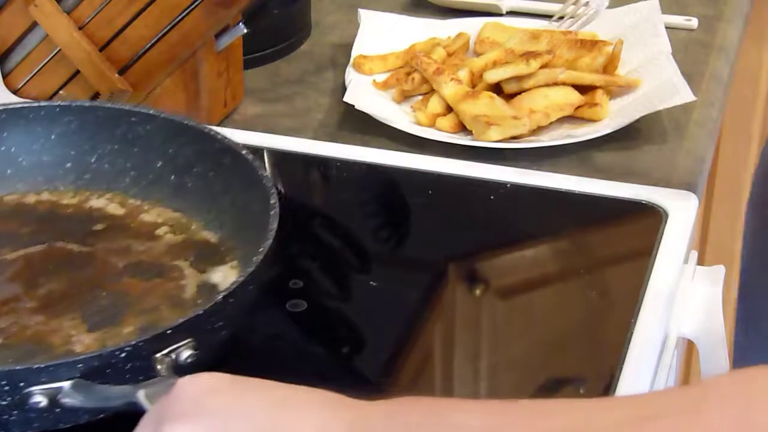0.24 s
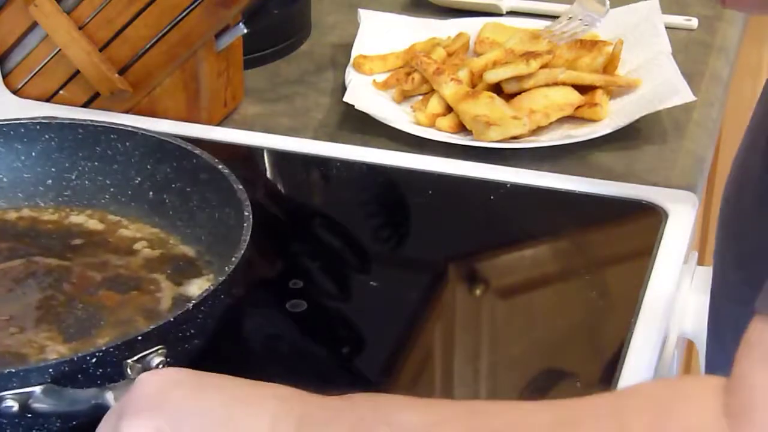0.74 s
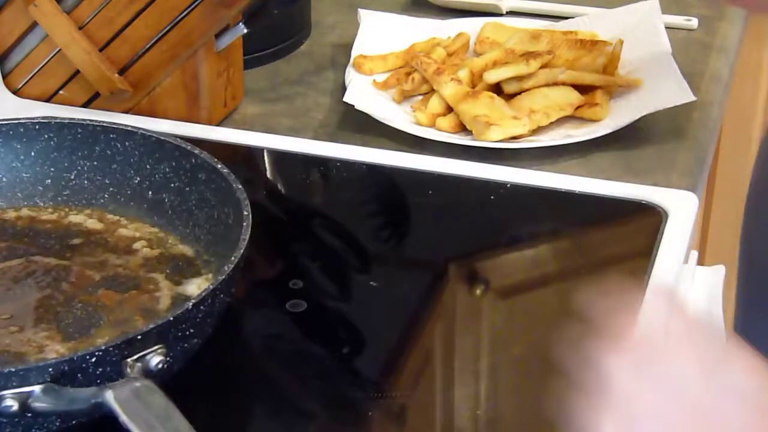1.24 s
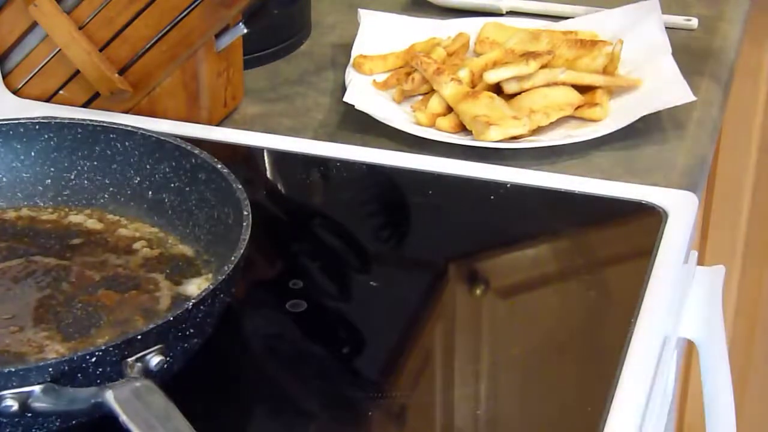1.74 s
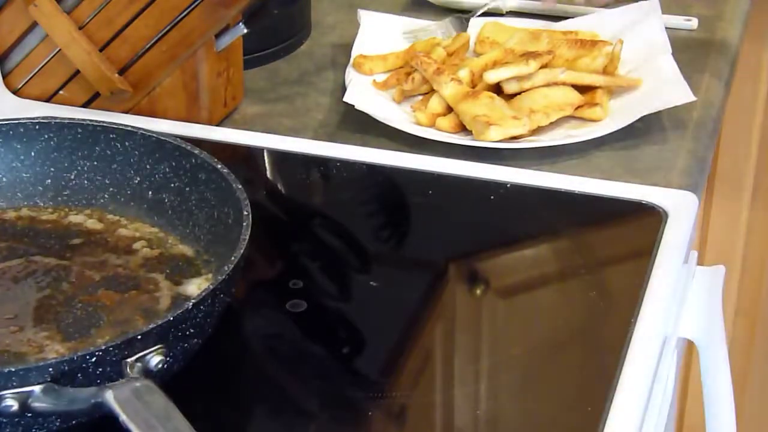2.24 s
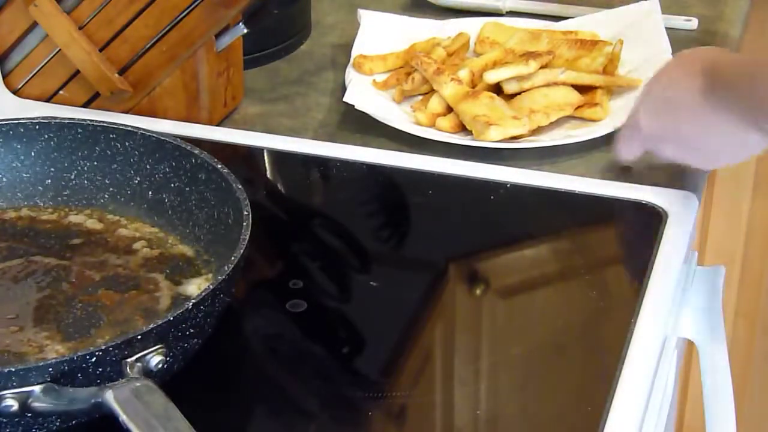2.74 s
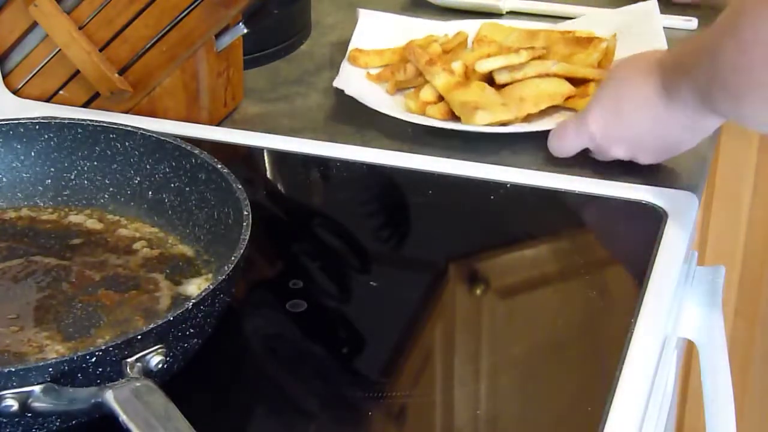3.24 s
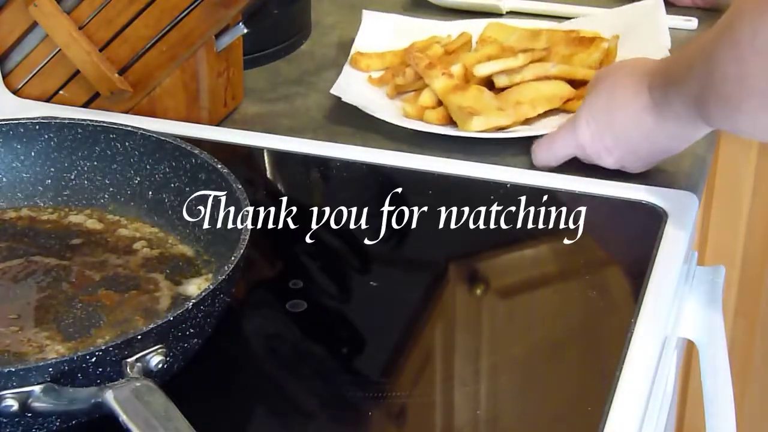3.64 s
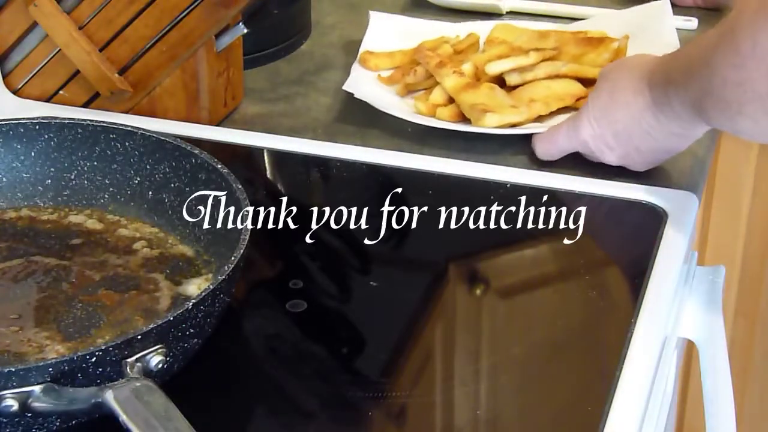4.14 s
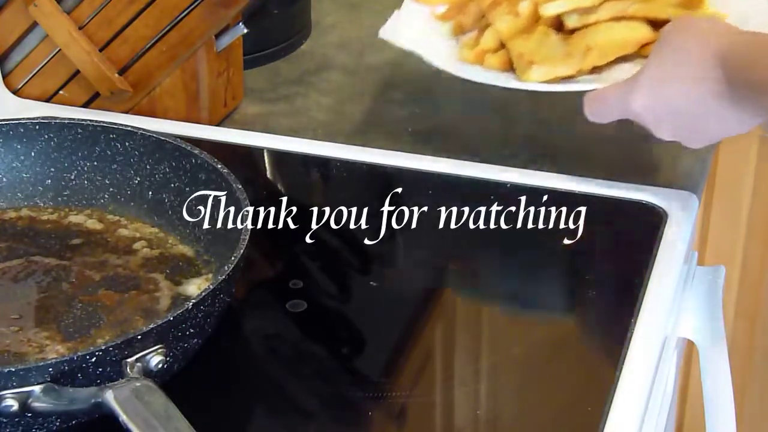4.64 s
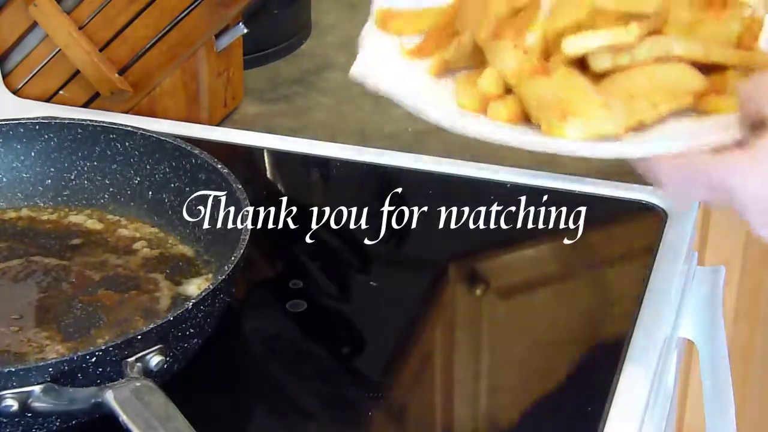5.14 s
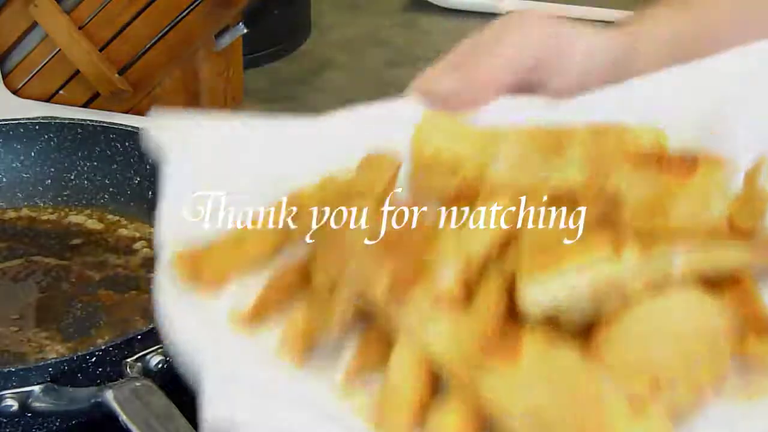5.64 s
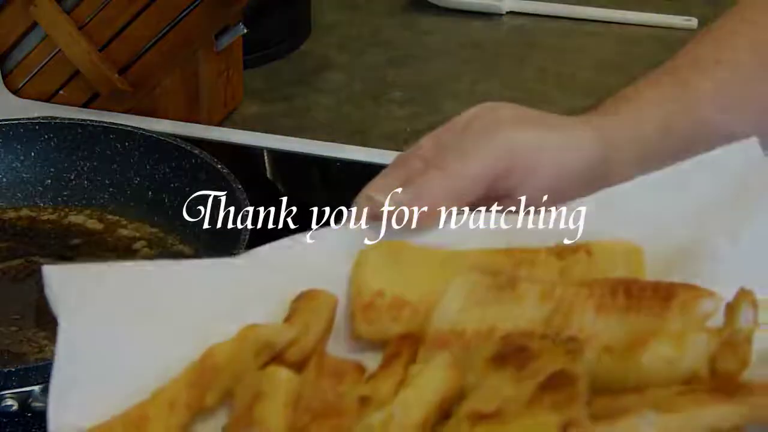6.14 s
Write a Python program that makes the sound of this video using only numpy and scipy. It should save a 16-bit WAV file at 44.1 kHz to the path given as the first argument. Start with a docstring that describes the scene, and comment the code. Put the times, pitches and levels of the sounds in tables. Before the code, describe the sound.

A close, slightly hissy microphone in a reverberant kitchen picks up a constant dull fan. Near the start a pan clunks heavily with a short metallic rattle. After a quiet stretch of light rustling and clicks, a plate bumps softly, then gives bright, hard ceramic knocks, a scrape and several closing taps. Soft rustles and small ticks remain over the fan.

```python
"""A home kitchen under a droning extractor fan, with paper and cloth rustling and small things ticking.
A heavy pan clunks on a glass hob, rattles and settles; a plate is nudged, knocked and dragged off the counter.
Contacts are short knocks, thuds and clicks that ring modal bodies; drags are trains of random slips.
Fan, rustle and hiss are filtered noise, the fan with a thin whine. Echoes and a diffuse tail of over half
a second answer the contacts and rustle at two close microphone ports, which hiss and saturate."""
import sys
import numpy as np
from scipy import signal
from scipy.fft import rfft, irfft, next_fast_len
from scipy.io import wavfile
from scipy.ndimage import uniform_filter1d

SR = 44100
rng = np.random.default_rng(int(sys.argv[2]) if len(sys.argv) > 2 else 0)


def generate_wav(signal):
    """Clip the signal to [-1, 1] and save it as 16-bit WAV at the path in sys.argv[1]."""
    frames = np.transpose(np.atleast_2d(signal))
    scaled = np.clip(frames, -1, 1) * 32767
    pcm = np.round(scaled).astype(np.int16)
    wavfile.write(sys.argv[1], SR, pcm)


N = 281074
TIME = np.arange(N) / SR

# Fan air spectrum. Each row: frequency in Hz, relative density in dB per Hz.
FAN_SPECTRUM = [(15, -55), (25, -32), (53, -16), (85, -22.5), (107, -10), (252, -3.5), (289, -1),
                (365, -8.5), (605, -13.5), (680, -16.5), (947, -15), (1130, -19), (1450, -26), (1660, -31),
                (2600, -56), (3380, -53), (5720, -120)]
FAN_DB, SWELL_DB = -43.5, 1.1  # rms before the swell; spread of the swell
FAN_WHINE_HZ, FAN_WHINE_DB = 1431, -68.5  # mean pitch, rms

# Hiss spectrum of the ports. Each row: frequency in Hz, relative density in dB per Hz.
HISS_SPECTRUM = [(710, -50), (1200, 0.5), (1310, -0.5), (1460, -17.5), (1660, -10), (2030, -9.5),
                 (3180, -13), (5130, -11), (7600, -16.5), (9880, -43), (16700, -120)]
HISS_DB = -56.5  # rms before the top cut

# Diffuse tail of the room. Each row: frequency in Hz, t60 in seconds, relative level in dB.
ROOM_DECAY = [(97, 0.62, -10), (254, 0.57, 9), (734, 0.7, 5.5), (1800, 0.54, 5.5), (4320, 0.54, 9),
              (8300, 0.85, -10.5)]
# Near echoes off counter, cupboards and wall. Each row: delay in seconds, level in dB, left minus right in dB.
NEAR_ECHOES = [(.0042, -13, 4.5), (.0075, -16.5, -6.5), (.013, -20, 2.5), (0.017, -21.5, -6)]
ROOM_DB, ROOM_RISE_S = -6.5, 0.0011  # tail energy against the direct sound; onset time

# Likeness of diffuse noise at the two ports. Each row: frequency in Hz, correlation from 0 to 1.
PORT_LIKENESS = [(40, 1), (100, 1), (250, 1), (500, 0.95), (1000, 0.77), (2000, 0.3), (4000, 0.6),
                 (8000, 1)]
# Unequal response of the ports. Each row: frequency in Hz, left minus right in dB.
PORT_BALANCE = [(100, -1.5), (500, -1.5), (2000, -1.5), (4000, 0.5), (8000, 0.5)]
# Top cut of both ports. Each row: frequency in Hz, gain in dB.
TOP_CUT = [(5000, 0), (7000, -2), (7620, -7), (7850, -32), (8500, -32), (8750, -80)]
LEFT_LAG_S, LAG_TOP_HZ = .00005, 5200  # the left port lies further off; the lag fades above LAG_TOP_HZ
KNEE = .7  # amplitude where saturation begins
CLIP_TOP_HZ = 15700  # low-pass after saturation

# Low cabinet booms, soon after some of the pan and plate blows. Each row: start in seconds,
# level in dB before the slow rise.
CABINET_BOOMS = [(0.431, -33), (0.63, -33), (4.26, -43.5), (4.547, -36.5)]
BOOM_HZ, BOOM_T60_S = 72.6, 0.41
# Dull bump of the plate on the counter. Each row: frequency in Hz, level in dB before the rise, t60 in seconds.
COUNTER_MODES = [(215, -27, 0.13), (450, -28.5, 0.09), (690, -33, 0.065)]
BUMP_S = 3.126

# Paper and cloth. Each row: peak time in seconds, level in dB, centre in Hz, fade in dB per second.
RUSTLE_SWELLS = [(1.2, -45, 3280, 356), (2.19, -51.5, 6200, 80), (2.34, -49, 5330, 60),
                 (2.46, -50, 2220, 232), (2.6, -49, 4800, 88), (2.97, -52, 6100, 106),
                 (3.03, -44, 3595, 252), (3.15, -47, 4520, 189), (3.648, -41.5, 1500, 503),
                 (3.69, -48.5, 4280, 112), (5.11, -49.5, 4330, 146), (5.459, -50, 4960, 180),
                 (5.99, -42.5, 3700, 155)]
RUSTLE_RISE_DB_PER_S = 344

# Small light contacts. Each row: start in seconds, level in dB, pitch in Hz, left minus right in dB,
# click over ring in dB, ring t60 in seconds.
SMALL_TICKS = [(0.1788, -51.5, 5100, 1, 8, 0.03), (1.1948, -51, 4030, 0, 0, 0.034),
               (1.197, -55, 2400, -4, -5, 0.045), (2.1804, -54, 7040, 0, 8, .02),
               (2.192, -51, 6500, 0, -4, .04), (2.384, -48, 2740, 3, -10, 0.052),
               (2.4309, -49.5, 1660, -2, 7, 0.046), (2.432, -49, 2460, -2, 1, .04),
               (2.4585, -53, 1970, -4, 11, 0.063), (2.598, -58, 4480, 0, -4.5, .05),
               (3.017, -50, 2290, 2, 3, 0.046), (3.117, -44, 4350, 0, 0, .05),
               (3.119, -45, 3460, -3, -4, .05), (3.66, -45, 4160, 0, 11.5, .012),
               (3.664, -45, 2580, 7, 10, 0.014), (3.667, -37, 4660, -2, -1, 0.02),
               (3.675, -43.5, 4960, 2.5, -2.5, .04), (3.685, -39, 3700, 2.5, -2, 0.022),
               (5.088, -53, 2520, -3, 1, .03), (5.579, -50.5, 5060, -5, -4, .025),
               (5.592, -57, 4930, 0, -5, .025), (5.83, -52.5, 4820, -3, 1, 0.028),
               (5.9756, -56, 2800, -8, 3, 0.028)]
# Modes of a small thing. Each row: share of the tick's pitch, level in dB.
SMALL_MODES = [(0.98, 0.5), (.83, -8.5), (1, -1.5), (.48, -3.5)]

# Pan rattling to rest. Each row: start in seconds, level in dB, treble over rumble in dB, hold in seconds,
# fade in dB per second.
PAN_RATTLE = [(.417, -22.5, 5.5, 0.019, 114), (.625, -39, -10, 0.024, 204)]
# Plate dragging across the counter. Each row: start in seconds, level in dB, treble over rumble in dB,
# hold in seconds, fade in dB per second.
PLATE_SLIDE = [(3.1155, -48.5, 11.5, 0.0072, 500), (3.13, -52, -7, 0.021, 250),
               (4.037, -24.5, -2, 0.0071, 186), (4.511, -24, 9.5, 0.0044, 203),
               (4.545, -36.5, 11, 0.13, 126), (4.58, -37, 1, 0.083, 140)]
DULLING_DB_PER_S = 76.5  # extra fade of the grit

# Vibration of the pan. Each row: frequency in Hz, level in dB, t60 in seconds.
PAN_BODY = [(183.7, 1.5, 0.25), (315, -1.5, 0.36), (455, 3, 0.19), (684, -5.5, 0.198), (920, -24, 0.12),
            (1056, -2.5, 0.2), (1250, -3, 0.18), (1410, 5, 0.33), (1740, 2.5, 0.14), (2080, -28, 0.076),
            (2490, -9, 0.078), (2750, -17, .07), (3340, -13, .07), (3560, -5, .07), (4050, -11, 0.069),
            (4430, -2.5, 0.045), (5100, -14, 0.045)]
# Vibration of the plate. Each row: frequency in Hz, level in dB, t60 in seconds.
PLATE_BODY = [(490, -8, .12), (700, -6, .1), (899, -7, .1), (1255, -6, .12), (1627, -1, .15),
              (1985, -8, .1), (2126, -7, .12), (2218, -9, .15), (2487, -8, .15), (2860, -3, .13),
              (3040, -4, .12), (3216, -8, .1), (3460, -14, .07), (3610, -10, .09), (3965, -10, .3),
              (4130, -10, .1), (4340, -12, .08), (4850, -18, .15), (5200, -16, .3), (5752, -5, .4),
              (5800, -13, .2), (6150, -12, .08), (6350, -10, .1), (6870, -12, .08), (7594, -1, .4),
              (8408, 12, .38)]
# Contacts of the pan. Each row: start in seconds, knock level in dB, knock pitch in Hz, then thud, tick,
# low ring and high ring over the knock in dB.
PAN_CONTACTS = [(.4158, -6.5, 890, 5, 2, -4.5, -23), (.4615, -22, 1300, -16, -5, -16, -27),
                (.496, -17, 790, -9, -8, -10, -30), (.5215, -16, 630, -6, -6, -7, -27),
                (.6152, -13, 1490, -15, -12, -23, -30), (.4185, -14, 1030, 8, 11.5, -37, -21),
                (.6175, -13, 770, 5, -8.5, -15.5, -26), (.6215, -19, 1850, -13, -19, -38, -34)]
# Contacts of the plate. Each row: start in seconds, knock level in dB, knock pitch in Hz, then thud, tick,
# low ring and high ring over the knock in dB.
PLATE_CONTACTS = [(3.1211, -34, 1900, 12.5, 3.5, -27, -8), (3.2177, -36, 1590, -15, 2, -29, -39),
                  (4.0362, -1, 1890, -19, -25, -5.5, -28), (4.0405, -9, 3080, -28, 3, -21, -29),
                  (4.0868, -10.5, 1720, -12, -18, -27, -28), (4.2235, -21, 1830, -18.5, -4, -6, -21),
                  (4.2258, -10.5, 1730, -6.5, -24, -7.5, -27), (4.229, -14, 3270, -10.5, -12, -28, -35),
                  (4.5096, 0, 1440, -9.5, -2, -35, -14), (4.5142, -15, 1170, -22, -6, -21, -21),
                  (4.562, -24, 1700, -1, 11, -19, -11.5), (4.5655, -8, 6140, -6, 0, -27, -3),
                  (4.628, -9.5, 2670, -8, -9, -18, -4.5), (4.646, -9, 1760, -23, -11, -4, -29),
                  (4.665, -12, 1900, -16, -12, -21, -35), (4.582, -13, 1910, -21, -2, -14, -22),
                  (4.7, -19, 2000, -9, 5, -21, -19), (4.735, -23, 2180, -14, 0, -18, -20)]
HIGH_RING_HZ = 3700  # border between low and high ring
SPOT_DETUNE, SPOT_DB = .003, 2.5  # spread of mode pitch (share) and strength from blow to blow
LOW_CUT_HZ = 222


def undb(db):
    """Decibels express an amplitude ratio on a logarithmic scale; return the ratio."""
    return 10 ** (np.asarray(db) / 20)


def level(x, db):
    """Root-mean-square amplitude measures power: scale to the given rms in dB."""
    return x * undb(db) / np.sqrt(np.mean(x ** 2))


def on_log(table, hz, axis=1):
    """Linear interpolation on a log-frequency axis: read one column of a table."""
    rows = np.array(table, float)
    return np.interp(np.log(hz + 1), np.log(rows[:, 0]), rows[:, axis])


def shape(x, gain_at):
    """Linear filtering multiplies the spectrum by a gain, given as a function of frequency."""
    size = next_fast_len(x.shape[-1])
    hz = np.arange(size // 2 + 1) * SR / size
    return irfft(rfft(x, size) * gain_at(hz), size)[..., :x.shape[-1]]


def diffuse_pair(size):
    """Partial coherence: shared and opposed noise set the correlation between the ports."""
    shared, opposed = rng.standard_normal((2, size))
    alike = lambda hz: np.clip(on_log(PORT_LIKENESS, hz), 0, 1)
    shared = shape(shared, lambda hz: np.sqrt((1 + alike(hz)) / 2))
    opposed = shape(opposed, lambda hz: np.sqrt((1 - alike(hz)) / 2))
    return np.array([shared + opposed, shared - opposed])


def walk(rate):
    """Slow random modulation: levels held 1 / rate s and smoothed twice, with a spread near 1."""
    k = int(SR / rate)
    steps = np.repeat(rng.standard_normal(N // k + 1), k)
    return 1.355 * uniform_filter1d(uniform_filter1d(steps, k), k)[:N]


def ring(hz, t60, size):
    """Free damped vibration: one mode is a sine that falls 60 dB in t60 s."""
    t = np.arange(size) / SR
    return np.sin(2 * np.pi * hz * t) * np.exp(-np.log(1000) * t / t60)


def swell_in(size, rise_s):
    """Gradual build-up: an exponential approach to full level."""
    return 1 - np.exp(-np.arange(size) / SR / rise_s)


def add(out, s, sound, pan_db):
    """Superposition: sum a sound into both ports at s seconds, split by a level difference."""
    i = int(s * SR)
    out[:, i:i + len(sound)] += (sound * undb([[pan_db / 2], [-pan_db / 2]]))[:, :N - i]


def body(modes, force):
    """Modal superposition: the force is convolved with the sum of all modes, at unit energy."""
    response = sum(undb(db) * ring(hz, t60, SR // 2) for hz, db, t60 in modes)
    return signal.fftconvolve(force, response / np.sqrt(np.sum(response ** 2)))


def click(hz, octaves, grit_db, t60):
    """Broadband impulse: a click and decaying grit pass a band around hz; peak 1."""
    size = SR // 8
    grit = undb(grit_db - 60 * np.arange(size) / SR / t60) * rng.standard_normal(size)
    grit[0] += 1
    edges = [hz / 2 ** octaves, min(hz * 2 ** octaves, .45 * SR)]
    sound = signal.sosfilt(signal.butter(2, edges, "band", fs=SR, output="sos"), grit)
    return sound / np.abs(sound).max()


def fan():
    """Broadband flow noise with slow amplitude modulation, and a motor tone that wanders in frequency."""
    air = level(shape(diffuse_pair(N), lambda f: undb(on_log(FAN_SPECTRUM, f))), FAN_DB)
    air = air * undb(SWELL_DB * walk(6))
    whine = np.sin(2 * np.pi * np.cumsum(FAN_WHINE_HZ + 3 * walk(4.8)) / SR)
    return air + level(whine, FAN_WHINE_DB)


def room(dry):
    """Reverberation: four early reflections and a diffuse tail decaying exponentially in each band."""
    size = int(.9 * SR)
    t, noise, tail = np.arange(size) / SR, diffuse_pair(size), 0
    for hz in 60 * 2 ** np.arange(0, 7.6, .5):
        band = shape(noise, lambda f: np.exp(-(np.log2((f + 1) / hz) / 1.07) ** 2))
        # even out chance swells so that the decay is smooth
        band = band * np.sqrt(hz / uniform_filter1d(np.sum(band ** 2, 0), size=int(12 * SR / hz)))
        decay_db = on_log(ROOM_DECAY, hz, axis=2) - 60 * t / on_log(ROOM_DECAY, hz)
        tail = tail + undb(decay_db) * band
    tail = tail * (1 - np.exp(-(t / ROOM_RISE_S) ** 2))
    response = tail * undb(ROOM_DB) / np.sqrt(np.sum(tail ** 2) / 2)
    for late, db, pan_db in NEAR_ECHOES:
        add(response, late, np.array([undb(db)]), pan_db)
    return dry + signal.fftconvolve(dry, response, axes=1)[:, :N]


def cabinet_booms():
    """Low resonance: one deep mode of the cabinets swells late and lingers."""
    out, size = np.zeros((2, N)), SR // 2
    for s, db in CABINET_BOOMS:
        add(out, s, undb(db) * ring(BOOM_HZ, BOOM_T60_S, size) * swell_in(size, 0.046), 0)
    return out


def counter_bump():
    """Soft impact: a few low, heavily damped modes build up over milliseconds."""
    out, size = np.zeros((2, N)), SR // 4
    bump = sum(undb(db) * ring(hz, t60, size) for hz, db, t60 in COUNTER_MODES)
    add(out, BUMP_S, bump * swell_in(size, 0.0047), 0)
    return out


def rustle():
    """Crackling noise: dense crinkles of uneven size, in swells weighted around their own centre bands."""
    crinkles = rng.standard_normal(N) * undb(1.44 * rng.exponential(size=N)) * undb(4 * walk(40))
    swells = []
    for s, db, _, fade_db in RUSTLE_SWELLS:
        drop_db = np.maximum(RUSTLE_RISE_DB_PER_S * (s - TIME), fade_db * (TIME - s))
        swells.append(undb(db - drop_db))
    swells = np.array(swells)
    centres, out = np.log2(np.array(RUSTLE_SWELLS)[:, 2]), 0
    for octave in np.log2(1200) + np.arange(0, 3, .5):
        band = shape(crinkles, lambda f: np.exp(-((np.log2(f + 1) - octave) / 0.31) ** 2))
        weights = np.exp(-((octave - centres) / 1.34) ** 2)
        out = out + level(band, -16) * (weights @ swells)
    return out


def ticks():
    """Light impact: a click together with the short ring of a few modes."""
    out = np.zeros((2, N))
    for s, db, hz, pan_db, click_db, t60 in SMALL_TICKS:
        modes = sum(undb(mode_db) * ring(hz * share, t60, SR // 8) for share, mode_db in SMALL_MODES)
        add(out, s, undb(db) * (modes + undb(click_db) * click(hz, 0.34, -9.5, 0.04)), pan_db)
    return out


def drag(table, modes, slips_per_s, spread_db, knee_hz, grit_hz, ring_db, judder_db):
    """Sliding friction: random slips are heard as rumble and grit and through the object's modes."""
    slips = (rng.random(N) < slips_per_s / SR) * rng.standard_normal(N)
    slips = slips * undb(spread_db * rng.exponential(size=N))
    # even out the local strength of the slips, so the drag stays steady
    slips = slips / np.sqrt(uniform_filter1d(slips ** 2, size=SR // 100) + 1e-3)
    slips = slips * undb(judder_db * walk(300))  # the base judders
    rumble = shape(slips, lambda f: f / (f + 150) / (1 + (f / knee_hz) ** 2))
    slips = level(slips, 0)
    grit = shape(slips, lambda f: f / (f + knee_hz) / (1 + (f / grit_hz) ** 4))
    weight = bright = 0
    for s, db, treble_db, hold, fade_db in table:
        after = np.maximum(TIME - s - hold, 0)
        pressure = (TIME > s) * undb(db - fade_db * after)
        weight = weight + pressure
        bright = bright + pressure * undb(treble_db - DULLING_DB_PER_S * after)
    through_object = undb(ring_db) * body(modes, weight * slips)[:N]
    return weight * level(rumble, 0) + bright * grit + through_object


def blows(table, modes, cycles, thud_hz, thud_rise_hz, thud_t60,
          tick_hz, tick_rise_hz, tick_octaves, tick_t60, grit_db, pan_db):
    """Impact excitation: a brief knock, thud and gritty tick ring the modes; rises are in Hz per dB of force."""
    out, size = np.zeros((2, N)), SR // 8
    # every contact lands and loads the object differently
    spots = rng.standard_normal((len(table), len(modes), 2))
    for (s, db, hz, thud_db, tick_db, low_db, high_db), spot in zip(table, spots):
        struck = [(f * (1 + SPOT_DETUNE * a), gain_db + SPOT_DB * b, t60)
                  for (f, gain_db, t60), (a, b) in zip(modes, spot)]
        low = body([m for m in struck if m[0] < HIGH_RING_HZ], np.ones(1))
        high = body([m for m in struck if m[0] > HIGH_RING_HZ], np.ones(1))
        turn = np.arange(size) * hz / SR  # cycles elapsed
        knock = np.sin(2 * np.pi * turn) * np.sin(np.pi * np.minimum(turn / cycles, 1) ** .65)
        thud = ring(thud_hz + thud_rise_hz * db, thud_t60, size)
        tick = click(tick_hz + tick_rise_hz * db, tick_octaves, grit_db, tick_t60)
        add(out, s, undb(db) * (knock + undb(thud_db) * thud + undb(tick_db) * tick), pan_db)
        low_ring = undb(db + low_db) * low / low.max()
        high_ring = undb(db + high_db) * high / high.max()
        add(out, s, low_ring + high_ring, pan_db)
    return out


def scene():
    """Superposition of sources: contacts and rustle excite the room, over booms, bump and fan."""
    dry = blows(PAN_CONTACTS, PAN_BODY, cycles=2.2, thud_hz=181, thud_rise_hz=0, thud_t60=0.054,
                tick_hz=4170, tick_rise_hz=91.0, tick_octaves=0.66, tick_t60=0.025, grit_db=16, pan_db=2.5)
    dry = dry + blows(PLATE_CONTACTS, PLATE_BODY, cycles=2.16, thud_hz=688, thud_rise_hz=8.6, thud_t60=0.014,
                      tick_hz=4970, tick_rise_hz=45.3, tick_octaves=0.83, tick_t60=0.049,
                      grit_db=-17, pan_db=1.2)
    dry = dry + drag(PAN_RATTLE, PAN_BODY, slips_per_s=4700, spread_db=4.0, knee_hz=1516, grit_hz=5800,
                     ring_db=-7, judder_db=6.5)
    dry = dry + drag(PLATE_SLIDE, PLATE_BODY, slips_per_s=9000, spread_db=0.6, knee_hz=1470, grit_hz=7000,
                     ring_db=-27.5, judder_db=4.5)
    # low cut: contacts and rustle reach the ports without deep bass
    low_cut = signal.butter(3, LOW_CUT_HZ, "high", fs=SR, output="sos")
    contacts = signal.sosfilt(low_cut, dry + ticks() + rustle())
    return room(contacts) + cabinet_booms() + counter_bump() + fan()


def record(dry):
    """Transducer limits: unequal hissing ports, a two-step top cut, then saturation that spits above the cut."""
    hiss = shape(rng.standard_normal((2, N)), lambda f: undb(on_log(HISS_SPECTRUM, f)))
    hiss = level(hiss, HISS_DB)
    side = np.array([[.5], [-.5]])  # left and right each take half the difference

    def port_gain(f):
        """Spaced reception: level and arrival time differ between the ports with frequency."""
        lag = LEFT_LAG_S / (1 + (f / LAG_TOP_HZ) ** 4)
        return undb(on_log(PORT_BALANCE, f) * side) * np.exp(-2j * np.pi * f * lag * side)

    cut = shape(shape(dry, port_gain) + hiss, lambda f: undb(on_log(TOP_CUT, f)))
    clean = np.clip(cut, -KNEE, KNEE)
    rounded = clean + (1 - KNEE) * np.tanh((cut - clean) / (1 - KNEE))
    return signal.sosfilt(signal.ellip(8, .2, 60, CLIP_TOP_HZ, fs=SR, output="sos"), rounded)


dry = scene()
out = record(dry)
generate_wav(out)
```